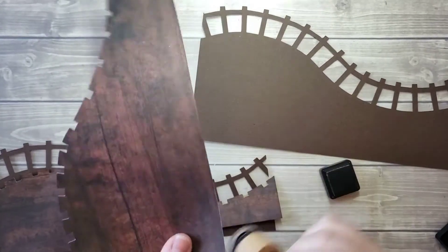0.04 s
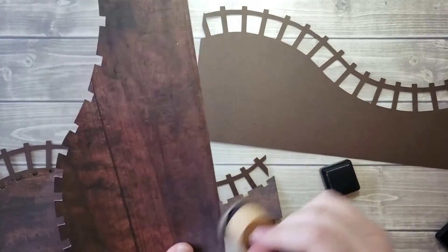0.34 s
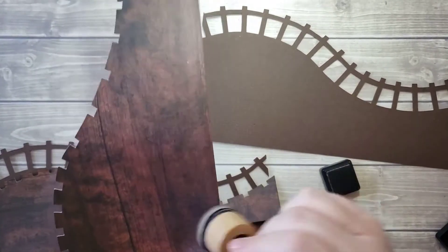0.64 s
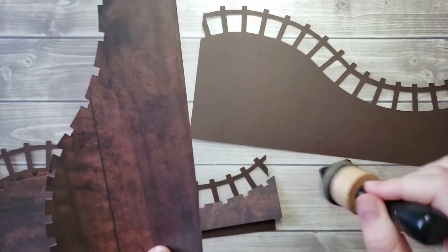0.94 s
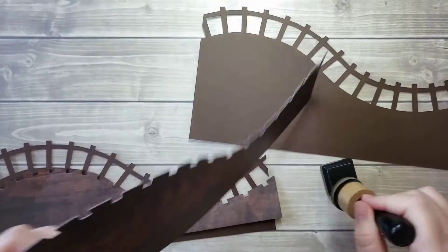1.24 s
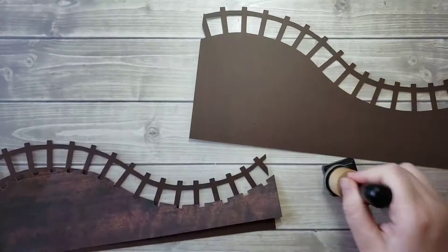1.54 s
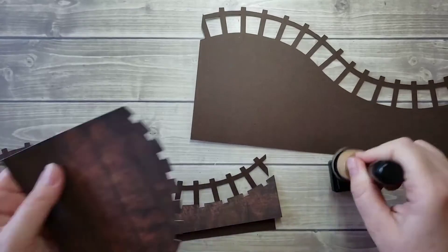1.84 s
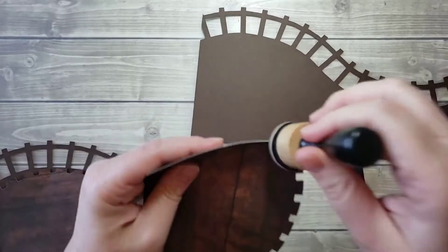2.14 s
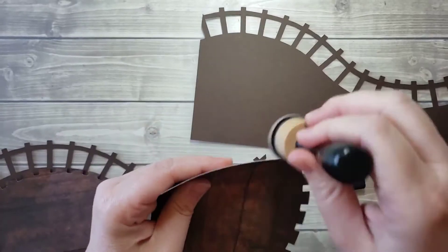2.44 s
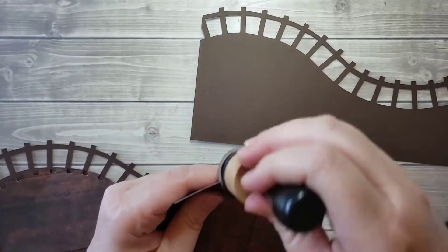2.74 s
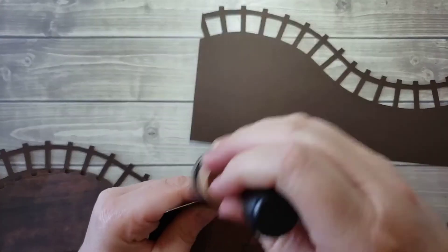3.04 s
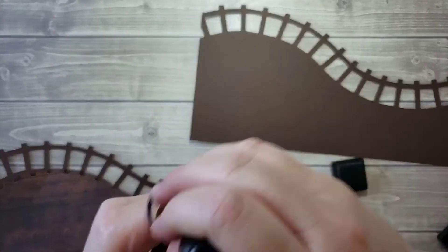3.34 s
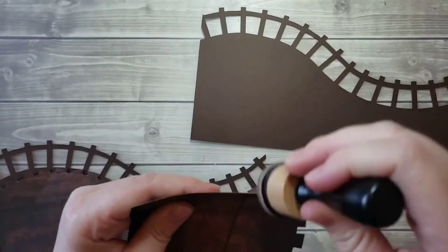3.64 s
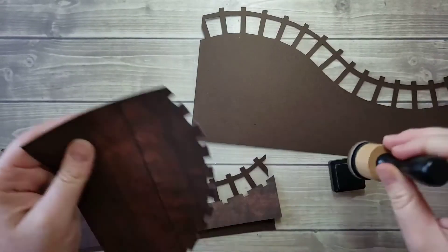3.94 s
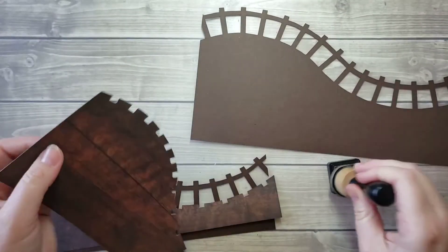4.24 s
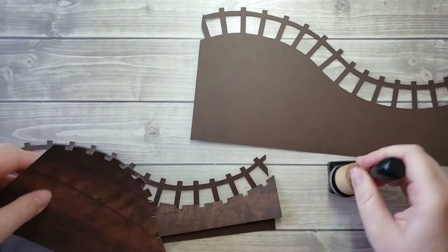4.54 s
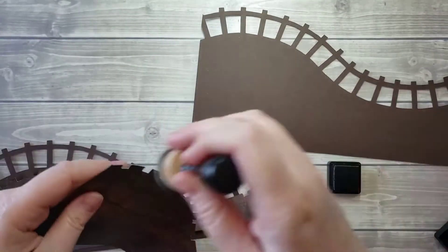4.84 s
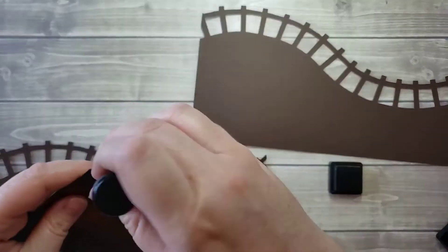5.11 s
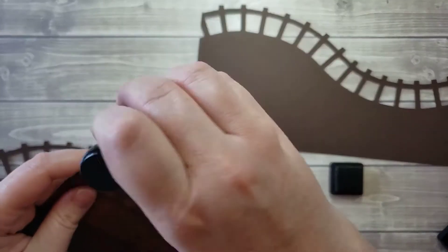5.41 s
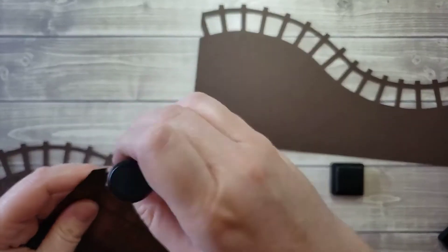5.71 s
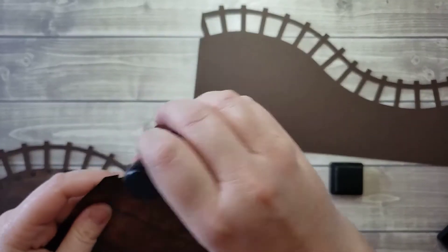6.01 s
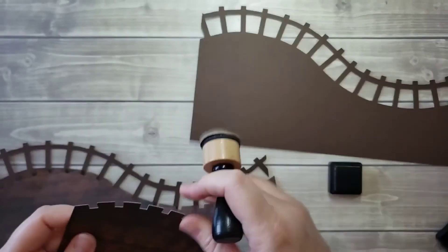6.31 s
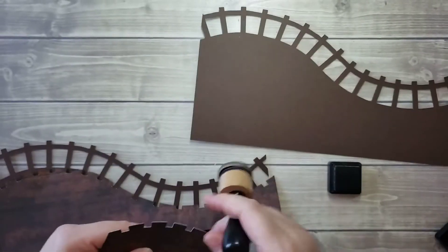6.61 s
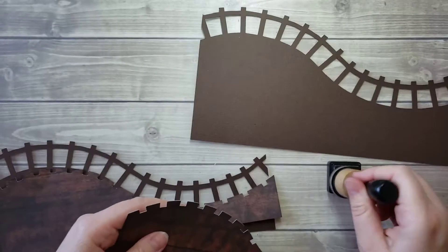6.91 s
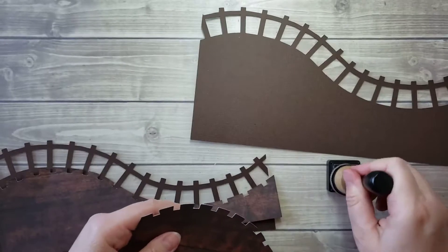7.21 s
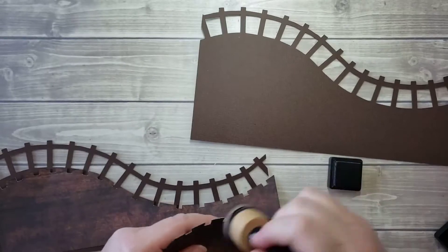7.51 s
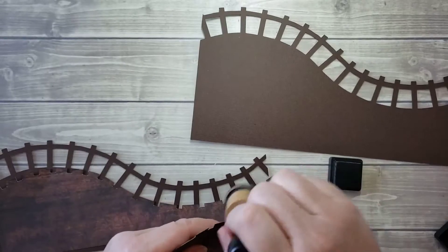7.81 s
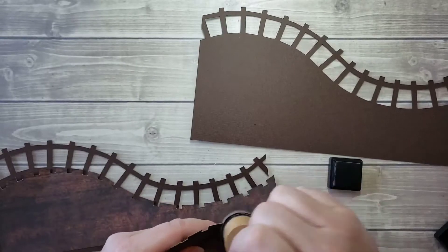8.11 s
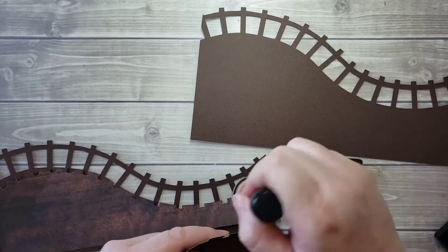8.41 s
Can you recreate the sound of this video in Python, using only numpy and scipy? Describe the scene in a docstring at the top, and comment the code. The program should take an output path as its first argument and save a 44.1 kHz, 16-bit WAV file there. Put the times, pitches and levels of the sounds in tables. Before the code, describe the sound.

A foam ink dauber brushes the edge of a hand-held card in short, dry scuffs, many ending in a crisp snap as the edge springs free. Between runs of strokes the card slides and rustles. Three times the dauber is tapped a few times on an ink pad, and the table booms softly beneath it, loudest the first time. The microphone is close to the hands in a small, quiet room.

```python
"""Inking the edge of a card

A small room, a camera's stereo microphone close to the hands. A foam ink dauber is brushed and flicked
over the edge of a hand-held card: each stroke is a dry scuff that often ends in a snap as the edge
springs free. Card slides and rustles in between. In three short runs the dauber is tapped on the ink
pad, and the table booms softly under it."""
import sys
import numpy as np
from scipy import signal
from scipy.fft import rfft, irfft, next_fast_len
from scipy.io import wavfile
from scipy.ndimage import map_coordinates

SR = 44100
rng = np.random.default_rng(int(sys.argv[2]) if len(sys.argv) > 2 else 0)


def wav_out(sig):
    """Save sig, one row per channel (or a flat mono array), as 16-bit PCM at SR to the path in sys.argv[1]."""
    wavfile.write(sys.argv[1], SR, np.round(np.clip(np.atleast_2d(sig).T, -1, 1) * 32767).astype(np.int16))


N = 377055


def amp(db):
    """Decibels to gain."""
    return 10 ** (np.asarray(db) / 20)


def unit(x):
    """Scale to rms 1."""
    return x / np.sqrt(np.mean(x ** 2) + 1e-20)


def along(points, hz):
    """Read (f/Hz, value) points on a log frequency axis."""
    f, values = np.transpose(points)
    return np.interp(np.log(hz + 1), np.log(f + 1), values)


def wobble(rate):
    """A smooth random curve, rate knots a second."""
    return map_coordinates(rng.standard_normal(int(N * rate / SR) + 4), [np.arange(N) * rate / SR])


def swell(t, rise, fall):
    """A smooth rise up to t = 0 and a fall after it."""
    return np.exp(-np.abs(t / np.where(t < 0, rise, fall)) ** 1.5)


def filtered(x, response):
    """Filter x by a complex response of frequency."""
    n = x.shape[-1]
    padded = next_fast_len(n + 4096)
    return irfft(rfft(x, padded) * response(np.fft.rfftfreq(padded, 1 / SR)), padded)[..., :n]


def add(track, s, sound):
    """Mix a sound into the track at time s."""
    start = round(s * SR)
    skip, start = max(-start, 0), max(start, 0)
    part = sound[..., skip:skip + N - start]
    track[..., start:start + part.shape[-1]] += part


# how alike the microphone's two sides are: f/Hz, correlation
MIC_LIKENESS = [(100, 0.74), (600, 0.93), (1200, 0.72), (2200, 0.45), (4500, 0.43), (12000, 0.064)]
def at_mic(pair, spectrum, lead_ms=0):
    """Two unrelated signals become coloured stereo at rms 1, the right side lead_ms ahead."""
    turn = lambda hz: np.arccos(np.clip(along(MIC_LIKENESS, hz), 0, 1)) / 2
    colour = lambda hz: amp(along(spectrum, hz)) * [np.cos(turn(hz)), np.sin(turn(hz))]
    lead = lambda hz: np.exp(1j * np.pi * hz * lead_ms / 1000 * np.array([[-1], [1]]))
    mid, side = filtered(pair, colour)
    return unit(filtered(np.array([mid + side, mid - side]), lead))


def friction(spectrum, grain_db, grain_rate):
    """Countless tiny slips of uneven size, rms 1."""
    slips = rng.standard_normal((2, N)) * amp(grain_db * wobble(grain_rate))
    return at_mic(slips, spectrum, lead_ms=0.05)


# the room at rest: f/Hz, level/dB
ROOM_TONE = [(20, -9), (60, 15), (110, 11.5), (200, 1.5), (500, 1.5), (1500, -11.5), (4000, -5),
             (7200, -2.5), (9000, -18.5), (16000, -3.5)]
def room_tone():
    """The faint, steady air of the room."""
    return amp(-73) * at_mic(rng.standard_normal((2, N)), ROOM_TONE)


# the held card never lies quite still: t/s, rustle level/dB, hiss level/dB
CREEP = [(0.0, -74, -69), (0.16, -65, -68), (0.62, -69, -66), (1.07, -86, -71), (1.21, -70, -60.5),
         (1.79, -55.5, -63.5), (2.19, -93, -76.5), (2.48, -70, -58), (2.9, -70, -61), (3.47, -86, -79.5),
         (3.95, -60.5, -60.5), (4.12, -72, -68.5), (4.36, -77, -65), (4.57, -64, -51.5), (4.93, -74, -57),
         (5.31, -58.5, -54.5), (5.67, -65, -68), (5.97, -66, -67), (6.12, -84, -74), (6.41, -66, -66.5),
         (6.57, -59.5, -59.5), (7.19, -85.5, -83.5), (7.93, -65, -67), (8.24, -66, -66),
         (8.55, -59.5, -61.5)]
# it is turned or pushed along in the hand: peak t/s, length/s, level/dB
SLIDES = [(1.111, 0.144, -47), (1.338, 0.033, -47), (1.926, 0.21, -50.5), (4.074, 0.11, -52),
          (4.393, .1, -50), (4.832, .16, -49.5), (6.61, 0.083, -45.5), (6.843, 0.16, -68),
          (7.449, 0.14, -67)]
# its rustle and its hiss from close by: f/Hz, level/dB
SLIDE_RUSTLE = [(100, -18), (400, -17), (650, -7), (900, -2), (1150, -1), (1500, -1.5), (1900, -3.5),
                (3000, -37.5)]
SLIDE_HISS = [(1000, -26.5), (1800, -8), (2400, -1.5), (3200, 0.5), (4500, -3.5), (7200, -2.5), (8800, -14),
              (12000, -9.5), (16000, -14)]
def slides(crinkles_per_s=22, crinkle_s=0.0013):
    """Card creeps between the fingers and over the sheets beneath, catching in tiny crinkles."""
    s, rustle_db, hiss_db = np.transpose(CREEP)
    t = np.arange(N) / SR
    pushes = sum(amp(db) * swell(t - peak, length / 2, length / 2) for peak, length, db in SLIDES)
    unsteady = amp(1.1 * wobble(35))
    catches = (rng.random(N) < crinkles_per_s / SR) * rng.random(N)
    crinkle = 1 + 1.6 * signal.lfilter([1], [1, -np.exp(-1 / (crinkle_s * SR))], catches)
    rustle_gain = amp(np.interp(t, s, rustle_db) - 4.5) + amp(-16.5) * pushes
    hiss_gain = amp(np.interp(t, s, hiss_db) - 4) + amp(-3) * pushes
    rustle = rustle_gain * friction(SLIDE_RUSTLE, grain_db=2, grain_rate=200)
    hiss = hiss_gain * friction(SLIDE_HISS, grain_db=1.5, grain_rate=1200)
    return unsteady * (rustle + crinkle * hiss)


# the card in the hand: t/s, brightness/dB (facing the microphone), slack/dB (bending freely)
HOLD = [(.8, -2.5, -0.5), (1.3, -1.5, 0), (2.4, 2, 0), (2.8, -3, -6), (3.4, 4.5, -1.5), (4.05, 2, -4),
        (4.4, -5, -19.5), (5.2, -3, -23), (5.33, 0.5, -3.5), (6.1, 1.5, -5), (6.6, 0, -10), (7.7, 5, -13.5),
        (8.5, 1, -12.5)]
def hold(s):
    """Brightness and slack of the held card at time s, in dB."""
    times, *columns = np.transpose(HOLD)
    return [np.interp(s, times, column) for column in columns]


def gripped(x, depth_db=3.5, spacing_hz=110.04):
    """Each new grip on the card shifts its many narrow resonances."""
    knots = rng.standard_normal(400)
    gain = lambda hz: unit(amp(depth_db * map_coordinates(knots, [hz / spacing_hz], mode="mirror")))
    return filtered(x, gain)


# the card's voices from close by, low to high: f/Hz, level/dB
FLEX = [(40, -22), (130, -10), (230, -12), (400, -4), (600, -4.5), (800, -11), (1400, -49.5)]
SHEET = [(350, -45), (600, -19.5), (800, 2.5), (1100, -1.5), (1450, -2.5), (1800, -3.5), (2400, -13.5),
         (4000, -49)]
RASP = [(1000, -45), (1650, -3.5), (2100, -1), (2700, -1), (3600, -1), (4600, -3.5), (6000, -5),
        (7400, -4.5), (8600, -36), (12000, -37)]
FIZZ = [(5000, -35), (7500, 4.5), (9000, -2), (12000, 1.5), (15500, -1.5), (17000, -12.5)]
# foam and fingers rub the card: peak t/s, length/s, level/dB, sheet offset/dB, fizz offset/dB
SCUFFS = [(.018, 0.043, -42.5, -9.5, -11), (.211, .036, -40, -4, -13), (.408, 0.048, -37, -9.5, -13),
          (.586, 0.021, -42, -10.5, -11.5), (0.611, 0.045, -38, -14, -10), (0.767, 0.014, -43, -20, -14),
          (0.793, 0.037, -40.5, -13, -9.5), (1.35, 0.072, -52, -7, -4), (1.43, 0.06, -51, -8.5, -10.5),
          (1.61, 0.071, -54, -2, -13), (1.73, .1, -46.5, -9.5, -7.5), (2.024, .02, -50, -2, -8),
          (2.235, .02, -51, -3, -11.5), (2.288, .07, -45, -1.5, -9), (2.331, .017, -55, -1, -19),
          (2.414, 0.031, -47.5, 1.5, -12.5), (2.478, 0.068, -41.5, -7.5, -8),
          (2.6, 0.03, -58.5, 4.5, -10.5), (2.669, .054, -39.5, -6, -10.5), (2.785, 0.033, -49, -1.5, -10.5),
          (2.855, .057, -41, -5.5, -11.5), (2.902, 0.012, -45.5, -8, -12.5), (2.98, 0.014, -54.5, 0, -10.5),
          (3.052, 0.056, -42, -2.5, -9), (3.165, .05, -60.5, -6, -8.5), (3.248, 0.047, -46.5, -13, -7.5),
          (3.444, .053, -50, -7, -3), (3.615, .043, -44, -8.5, -11.5), (3.765, 0.039, -46, -5, -6.5),
          (3.802, 0.017, -36, -9.5, -24), (3.91, 0.054, -49, -3.5, -6.5), (4.02, 0.037, -49, -11.5, -4.5),
          (4.435, 0.045, -58.5, 12, -12), (4.5, 0.028, -42, -9.5, -11), (4.53, 0.02, -38, -14, -6.5),
          (4.636, 0.064, -37, -6, -15.5), (4.72, 0.15, -51, -11, -1.5), (5.053, 0.11, -49, -8, -10.5),
          (5.158, .025, -47.5, -2, -22), (5.248, 0.062, -45, -9.5, -14), (5.301, 0.024, -48.5, 9, -10.5),
          (5.333, 0.036, -57.5, 4, -12), (5.435, .025, -52, -5, -11), (5.63, 0.047, -58.5, 6.5, -8.5),
          (6.028, 0.021, -43, -6, -2), (6.059, 0.04, -46, 1.5, -7), (6.473, 0.073, -49, 0.5, -8.5),
          (6.569, 0.07, -49.5, -1.5, -5.5), (6.704, 0.038, -53.5, -3.5, -6.5),
          (7.69, .038, -48.5, -12, -7.5), (7.73, 0.026, -60, 8, -10), (7.888, .045, -50.5, 1, -6),
          (8.055, 0.048, -53.5, -2, -4.5), (8.275, 0.066, -53.5, -2, -8.5), (8.44, 0.028, -44.5, 0.5, -6.5),
          (8.52, 0.031, -60.5, 3.5, -10)]
def scuffs(rise_share=0.46, tail_lag_s=0.008, tail_rise_s=0.005, tail_fall_s=0.033):
    """The foam rubs over the edge: grainy friction that swells and dies with every stroke."""
    voices = np.array([amp(-5.5) * friction(FLEX, grain_db=3.5, grain_rate=140),
                       amp(-0.5) * friction(SHEET, grain_db=3, grain_rate=400),
                       amp(-0.88) * friction(RASP, grain_db=3, grain_rate=600),
                       amp(0.5) * friction(FIZZ, grain_db=2, grain_rate=520)])
    rubs = [(s, rise_share * length, (1 - rise_share) * length, *levels_db)
            for s, length, *levels_db in SCUFFS]
    # a short rasping tail dies away after each snap, louder after a louder crack
    snap_tails = [(s + tail_lag_s, tail_rise_s, tail_fall_s, db + sharp_db - 12, -3, -14)
                  for s, db, _, sharp_db, *_ in SNAPS]
    out = np.zeros((2, N))
    for s, rise, fall, db, body_db, fizz_db in rubs + snap_tails:
        _, slack_db = hold(s)
        gains = amp([db + body_db + slack_db, db + body_db, db, db + fizz_db])
        span = np.arange(max(round((s - 4 * rise) * SR), 0), min(round((s + 4 * fall) * SR), N))
        rasp = np.tensordot(gains, voices[:, :, span], 1) * swell(span / SR - s, rise, fall)
        add(out, span[0] / SR, gripped(rasp))
    return out


# the air between card, hands and table: t/s, lower f/Hz, upper f/Hz, strength/dB
POCKET = [(0, 580, 2200, 10.5), (.9, 665, 2180, 1), (1.08, 1020, 2380, 5.5), (1.25, 800, 3200, 8),
          (1.6, 1330, 3230, 2), (1.9, 970, 2820, 3.5), (2.25, 940, 2230, 1.5), (2.7, 1010, 3790, 1.5),
          (4.15, 957, 3200, 2), (4.35, 1340, 3190, 9.5), (4.65, 1160, 3340, 6), (5.1, 1050, 2200, -2),
          (5.45, 1150, 1780, 7), (5.6, 1080, 3110, 7.5), (5.85, 1080, 3030, 13.5), (6.1, 1176, 2600, -1),
          (6.35, 1433, 3650, 6), (7.55, 1570, 3660, 8.5), (8.03, 1460, 2970, 16), (8.55, 1280, 3100, 4.5)]
def air_pocket(x, dip_lag_s=0.045, dip_s=0.052):
    """Two resonances glide as the hands move; the rasp brightens when the card faces the microphone."""
    hz, t, spectra = signal.stft(x, SR, nperseg=512, noverlap=384)
    s, *columns = np.transpose(POCKET)
    lower_hz, upper_hz, strength_db = [np.interp(t, s, column) for column in columns]
    # just after each snap the resonances weaken and, if the sheet rings lower, dip towards its pitch
    dips = np.array([swell(t - snap[0] - dip_lag_s, dip_s, dip_s) for snap in SNAPS])
    dip_hz = 0.97 * np.array([[sheet_hz] for *_, sheet_hz, _ in SNAPS])
    strength_db = strength_db * (1 - 0.26 * dips.max(axis=0))
    low_hz = lower_hz - np.max(dips * np.maximum(lower_hz - dip_hz, 0), axis=0)
    high_hz = upper_hz * (low_hz / lower_hz) ** 0.3
    bump = lambda centre, octaves: np.exp(-(np.log2((hz[:, None] + 1) / centre) / octaves) ** 2)
    peak = lambda centre, octaves: bump(centre, octaves) - 0.37 * bump(centre, 3 * octaves)
    pocket_db = strength_db * (0.94 * peak(low_hz, octaves=0.35) + peak(high_hz, octaves=0.22))
    facing_db = hold(t)[0] * bump(5520, octaves=0.36)
    return signal.istft(spectra * amp(pocket_db + facing_db), SR, nperseg=512, noverlap=384)[1][:, :N]


# the card bends in the fingers between strokes: t/s, level/dB, fall/s
FLOPS = [(0.67, -65, 0.021), (0.744, -61, 0.025), (0.855, -58.5, 0.033)]
def flops(lag_s=0.032, rebound_s=0.021):
    """The whole card bends and pushes a dull puff of air; it also bends back after every scuff."""
    push, t = np.zeros(N), np.arange(-SR // 5, SR // 5) / SR
    rebounds = [(s + lag_s, db + body_db + hold(s)[1] - 8.5, rebound_s)
                for s, _, db, body_db, _ in SCUFFS]
    for s, db, fall in FLOPS + rebounds:
        add(push, s + t[0], amp(db) * swell(t, 0.85 * fall, fall))
    return amp(1.5) * push * friction(FLEX, grain_db=2.5, grain_rate=160)


def unit_blow(x):
    """Scale a transient to a set power over its first 9 ms."""
    return x / np.sqrt(np.mean(x[..., :SR // 111] ** 2) * 9 / 5)


def sheet_ring(t, hz, t60, attack_s=0.00075):
    """One damped mode of a thin sheet, which radiates almost nothing below it."""
    mode = np.sin(2 * np.pi * hz * t) * amp(-60 * t / t60) * (1 - np.exp(-t / attack_s))
    return unit_blow(signal.lfilter(*signal.butter(2, 0.75 * hz, "high", fs=SR), mode))


# the stiff edge and its crack from close by: f/Hz, level/dB
EDGE = [(1100, -31), (1700, -4.5), (2600, 1), (3500, 0.5), (4600, -15.5), (7000, -46.5)]
CRACK = [(2500, -22.5), (3700, 1), (6000, 2.5), (7400, -5.5), (8600, -14.5), (12000, -39)]
# the edge springs free or is struck, just right of the microphone:
# t/s, edge level/dB, sheet offset/dB, crack offset/dB, sheet f/Hz, edge f/Hz
SNAPS = [(0.2207, -28.5, -3, -15.5, 817, 2090), (0.4176, -34, -13, -22.5, 1140, 2130),
         (1.2574, -34, -12, -5, 1210, 3400), (1.5514, -50.5, -2, 6, 1430, 3510),
         (1.593, -39.5, -12.5, -11.5, 1460, 3800), (1.629, -40.5, -3, -7.5, 1474, 3200),
         (1.6388, -37, -8.5, -13.5, 1486, 1940), (2.0266, -40, -5.5, 3.5, 1070, 2500),
         (2.682, -40, 1, -7.5, 1160, 2830), (2.871, -43, 1.5, -2, 1223, 2630),
         (3.448, -55.5, 12.5, -1.5, 975, 2090), (3.7894, -22.5, -1, -2.5, 1057, 1830),
         (3.9884, -46.5, -20, 1, 1596, 3340), (4.7302, -42, -8.5, 0.5, 1540, 3320),
         (5.0622, -39.5, -5.5, -18.5, 1172, 2000), (5.1904, -45, 1, -9.5, 853, 2250),
         (5.2958, -36.5, -5.5, -20, 1093, 1970), (5.4408, -34.5, -3.5, -4, 900, 1700),
         (5.5741, -59, 14, 3.5, 1016, 2910), (5.625, -41.5, 1, -4, 867, 1880),
         (5.834, -33, 5, 2, 915, 2430), (6.022, -41.5, 5, 7, 1185, 3690),
         (6.0461, -41, 13.5, -15.5, 1133, 2182), (7.6927, -41, 7, -3, 1140, 3660),
         (7.877, -40.5, 4.5, -3.5, 1026, 3130), (7.8839, -47.5, 12.5, -15.5, 1023, 1840),
         (8.0539, -30.5, -2, -7.5, 1007, 2570), (8.336, -45.5, 11, -1, 1300, 2620),
         (8.4126, -25.5, -7, -1, 1110, 3100)]
def snaps(crack_s=0.0034, flex_hz=470, edge_q=6):
    """A burst of cracks, a few ms long, kicks the sheet into some cycles of ringing."""
    out, t = np.zeros((2, N)), np.arange(SR // 16) / SR - 0.004
    after = np.maximum(t, 0)
    slip = 0.12 * np.exp(-np.abs(t) / crack_s)  # the edge slips faintly just before it lets go
    burst = np.where(t > 0, 1, slip) * np.exp(-(after / crack_s) ** 4)

    def crackle(spectrum, lead_ms):
        return unit_blow(at_mic(rng.standard_normal((2, len(t))) * burst, spectrum, lead_ms))

    for s, edge_db, body_db, sharp_db, sheet_hz, edge_hz in SNAPS:
        _, slack_db = hold(s)
        sheet_db = edge_db + body_db
        flex_db = sheet_db - 7 + 1.6 * slack_db
        fizz_db = -27 + 0.56 * edge_db + 1.3 * sharp_db
        lead_ms = rng.normal(0.04, 0.044)
        damping = lambda hz: 1j * hz * edge_hz / edge_q
        resonance = lambda hz: 0.14 + damping(hz) / (edge_hz ** 2 - hz ** 2 + damping(hz))
        flex = amp(flex_db) * sheet_ring(after, flex_hz * rng.lognormal(0, 0.13), t60=0.032)
        ring = sheet_ring(after, sheet_hz, t60=0.017)
        sheet = amp(sheet_db) * unit_blow(0.67 * ring + 0.45 * crackle(SHEET, lead_ms))
        edge = amp(edge_db) * unit_blow(filtered(crackle(EDGE, lead_ms), resonance))
        crack = amp(edge_db + sharp_db) * crackle(CRACK, lead_ms)
        fizz = amp(fizz_db) * crackle(FIZZ, lead_ms)
        add(out, s + t[0], flex + sheet + edge + crack + fizz)
    return out * amp([[-1.04], [0.96]])


def struck(modes, t):
    """Damped modes ring, their level and left-right phase a little different at each blow."""
    return sum(amp(db + rng.normal(0, 1) - 60 * t / t60)
               * np.sin(2 * np.pi * hz * t + rng.normal(0, 0.18, (2, 1))) for hz, db, t60 in modes)


# modes of the table top and of the ink pad's case: f/Hz, level/dB, t60/s
TABLE_MODES = [(34, -17, 0.78), (66.3, -16, 1), (107.2, -0.5, 0.68), (123, 5, 0.1), (155.3, -9, 0.28),
               (219, -12, 0.27)]
PAD_MODES = [(167, 2.5, 0.12), (240.5, -4.5, 0.24), (322, -2.5, 0.24), (351, -13, 0.3), (429, -13, 0.21)]
# the dull shudder of everything on the table: f/Hz, level/dB
SHUDDER = [(20, -8), (60, -5), (130, -1), (240, -6), (420, -21), (900, -46)]
# the dauber lands on the pad: t/s, table level/dB, case level/dB, contact/s
TAPS = [(1.166, -37, -41, 0.0075), (1.386, -33.5, -57, 0.0039), (1.617, -33.5, -60, 0.0031),
        (1.8, -36.5, -28.5, 0.0036), (4.15, -44, -33.5, 0.0099), (4.327, -47, -54, 0.006),
        (7.055, -64, -52, 0.0045), (7.075, -51.5, -46.5, 0.0097), (7.276, -56, -53, 0.0031)]
def taps(shudder_t60=0.33):
    """Soft foam on the ink pad: the table top booms and shudders, and the pad's case knocks."""
    out, t = np.zeros((2, N)), np.arange(SR) / SR
    for s, table_db, pad_db, contact_s in TAPS:
        shudder = amp(-12 - 60 * t / shudder_t60) * at_mic(rng.standard_normal((2, SR)), SHUDDER)
        boom = amp(table_db + 0.6) * (struck(TABLE_MODES, t) + shudder)
        knock = amp(pad_db - 10) * struck(PAD_MODES, t)
        add(out, s, (boom + knock) * (1 - np.exp(-t / contact_s)))
    return out * amp([[0.1], [1.1]])


# the small room's decay: f/Hz, t60/s
ROOM_DECAY = [(150, 0.47), (500, 0.25), (1400, 0.15), (4000, 0.23), (12000, 0.21)]
def room(x, gap_s=0.004):
    """A short tail, drawn anew every third of a second as the hands move about."""
    out, block = np.zeros((2, N)), SR // 3
    near_flat = [(100, 0.01), (16000, 0.0025)]
    for start in range(0, N, block):
        noise = at_mic(rng.standard_normal((2, block)), near_flat)
        noise += 0.9 * rng.standard_normal((2, block))
        hz, t, spectra = signal.stft(noise, SR, nperseg=256)
        decay = amp(-60 * t / along(ROOM_DECAY, hz)[:, None])
        tail = signal.istft(spectra * decay, SR, nperseg=256)[1]
        tail /= np.linalg.norm(tail[0])
        add(out, start / SR + gap_s, signal.fftconvolve(x[:, start:start + block], tail, axes=1))
    return out


def scene():
    """Card and dauber close to the microphone, the room's answer and its faint air behind them."""
    rubbing = (air_pocket(scuffs() + slides()) + flops()) * amp([[-0.4], [0.4]])
    snapping = snaps()
    to_room = amp(-8.5) * rubbing + amp(-7.5) * snapping
    return rubbing + snapping + taps() + room(to_room) + room_tone()


def record(dry):
    """The camera keeps nothing above 16.2 kHz."""
    return filtered(dry, lambda hz: hz < 16200)


dry = scene()
out = record(dry)
wav_out(out)
```